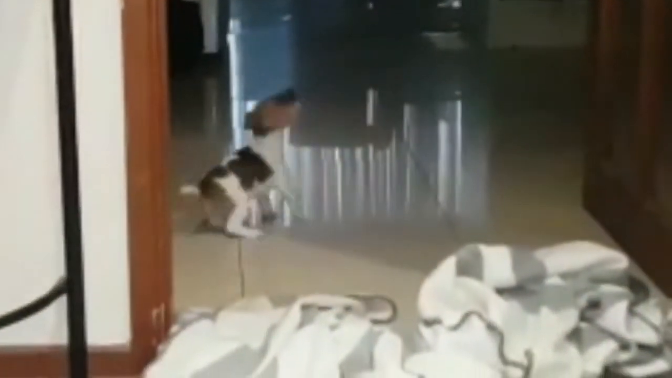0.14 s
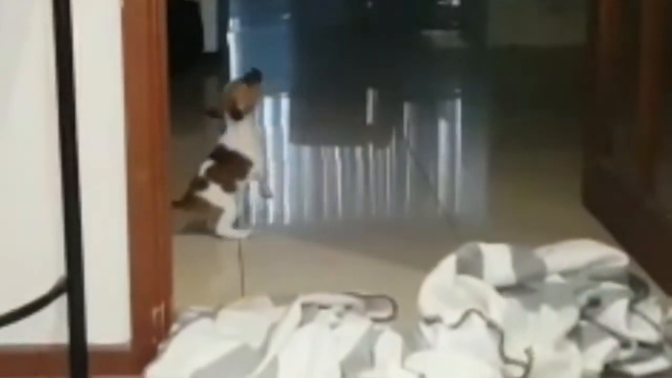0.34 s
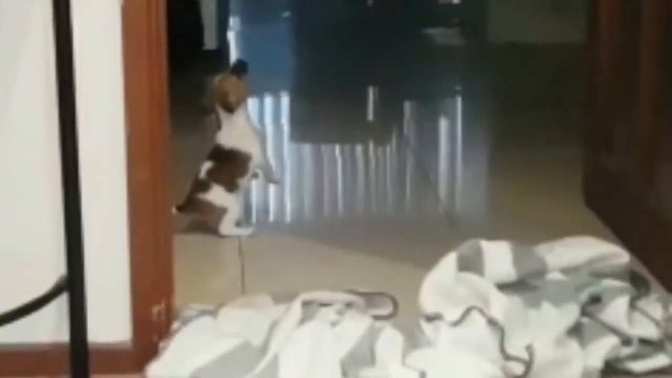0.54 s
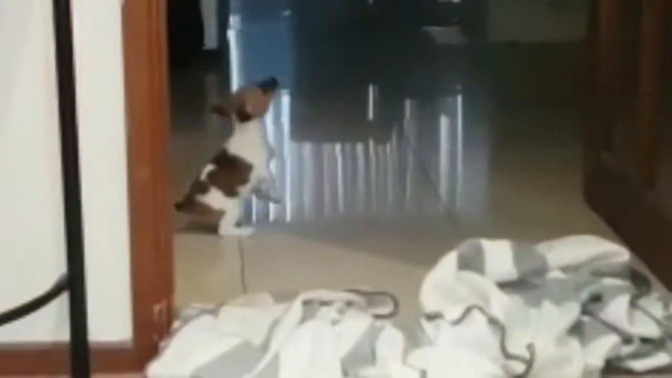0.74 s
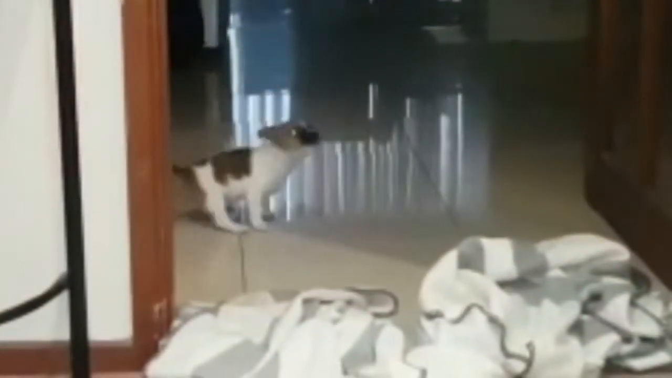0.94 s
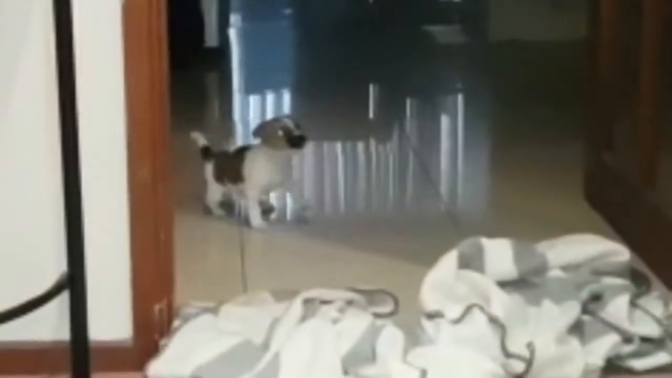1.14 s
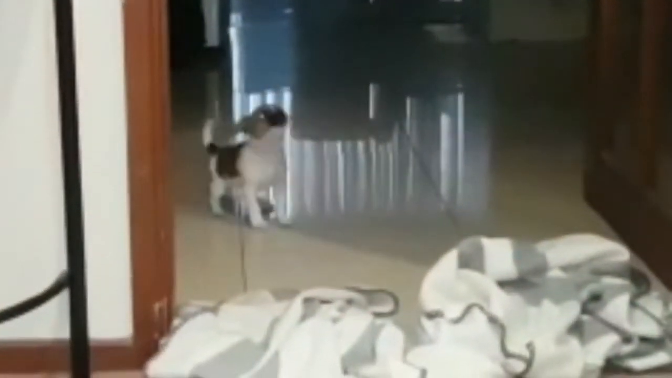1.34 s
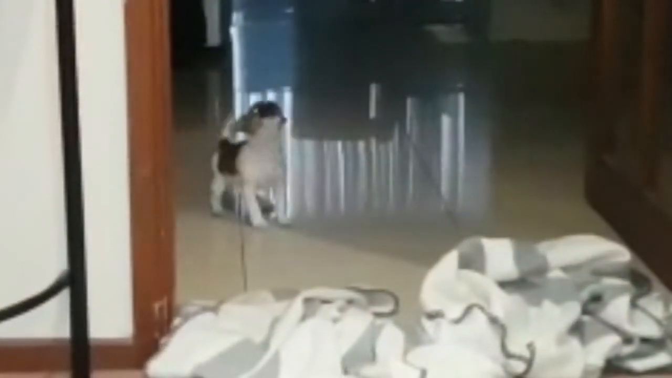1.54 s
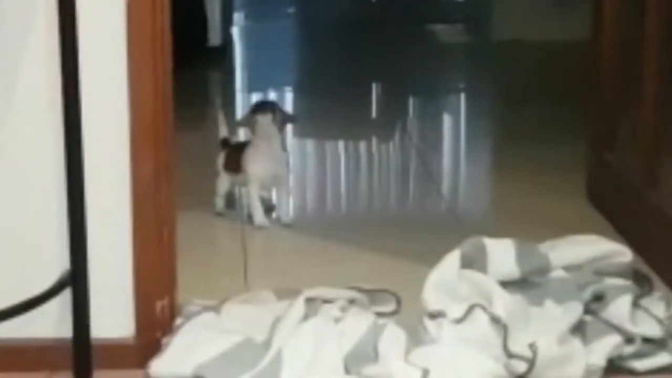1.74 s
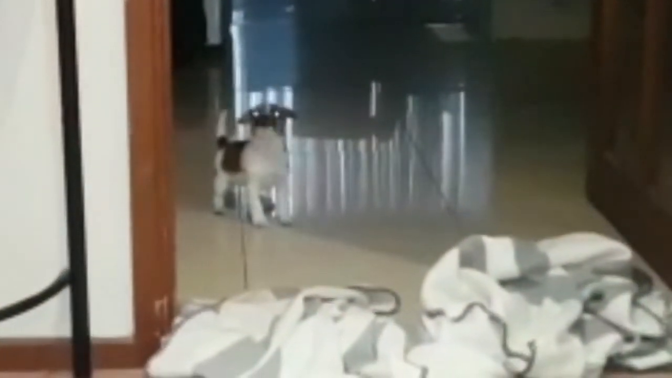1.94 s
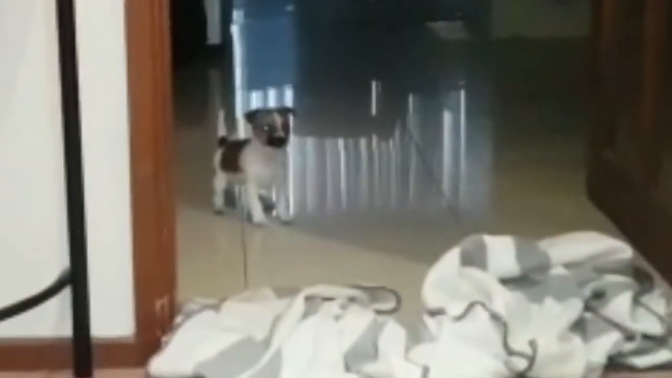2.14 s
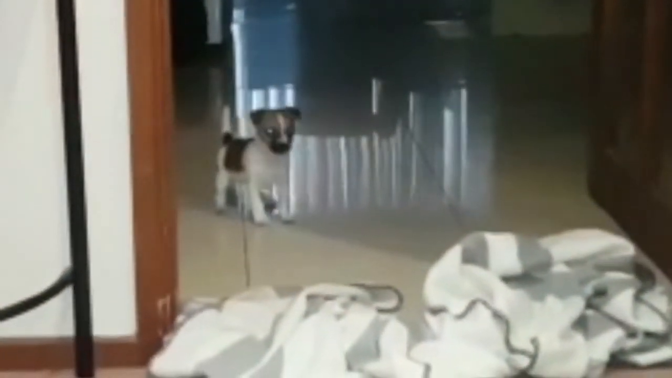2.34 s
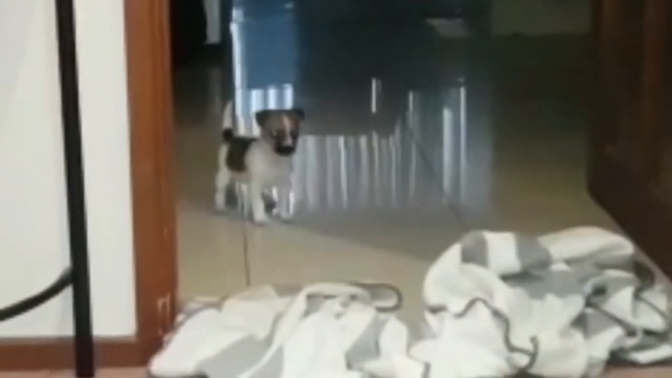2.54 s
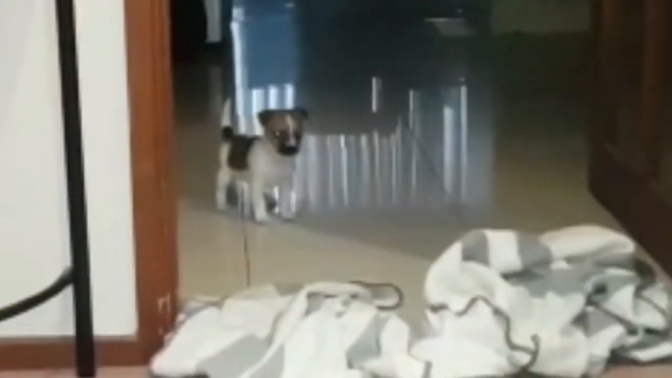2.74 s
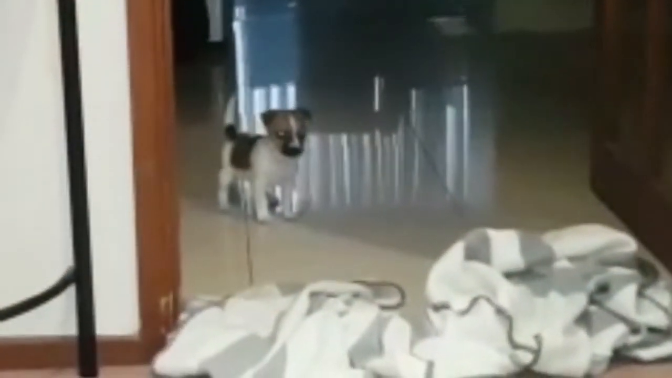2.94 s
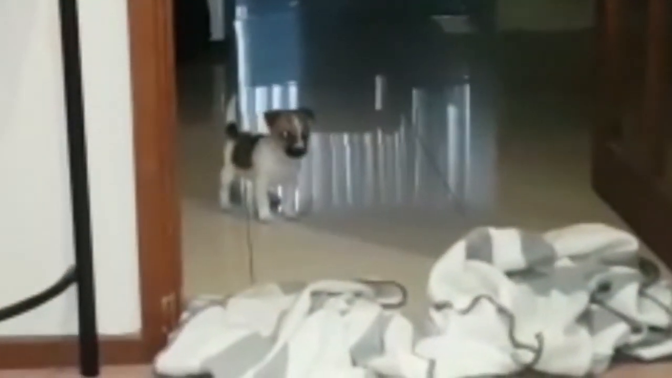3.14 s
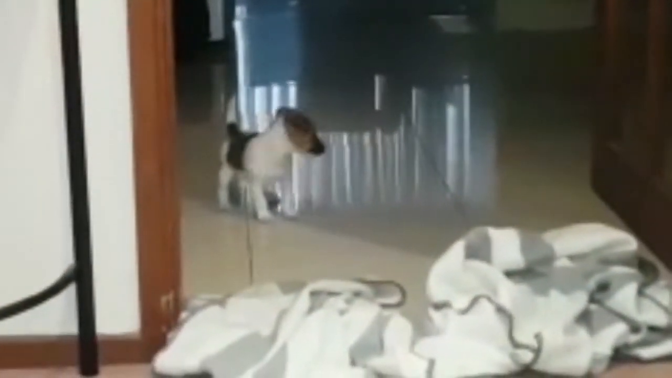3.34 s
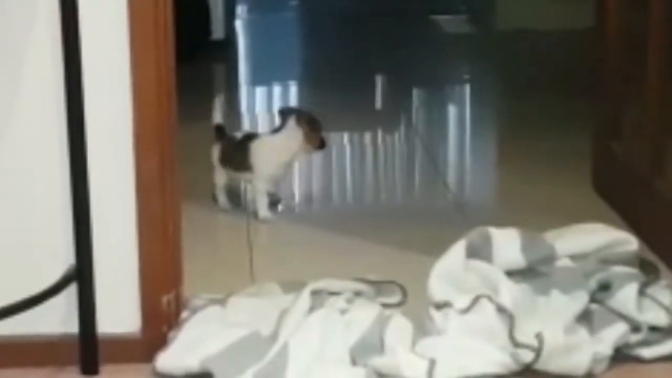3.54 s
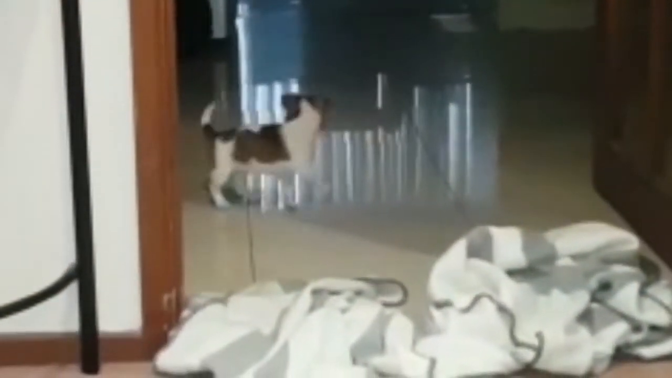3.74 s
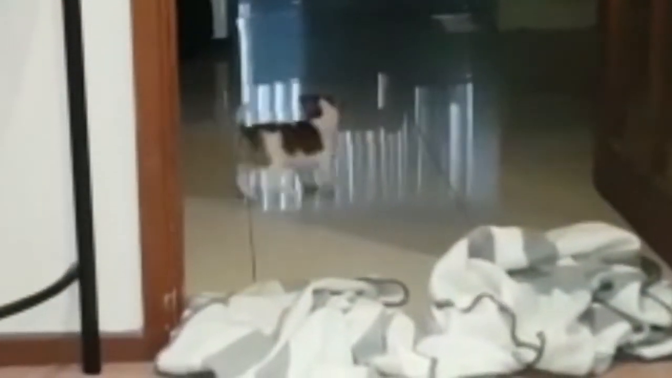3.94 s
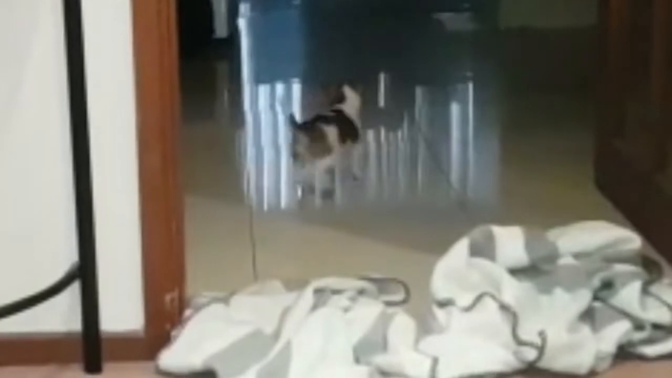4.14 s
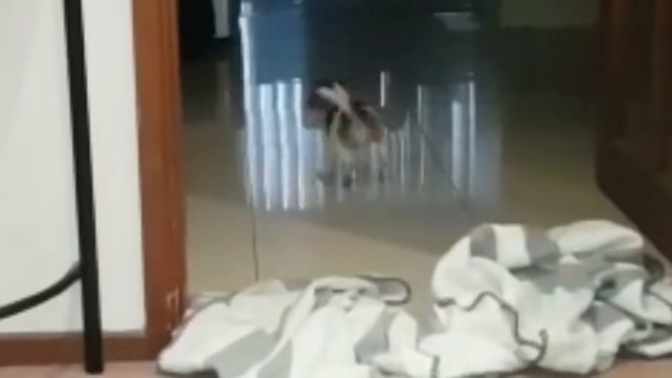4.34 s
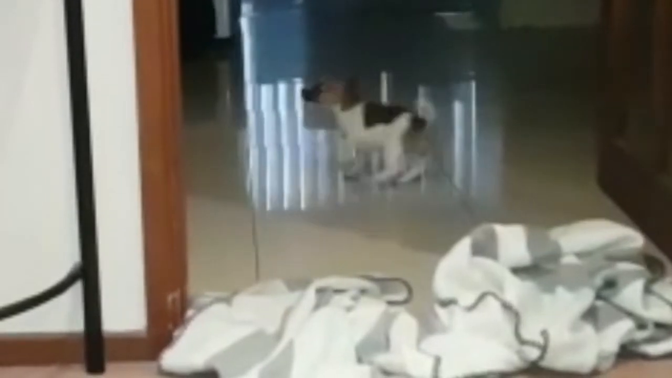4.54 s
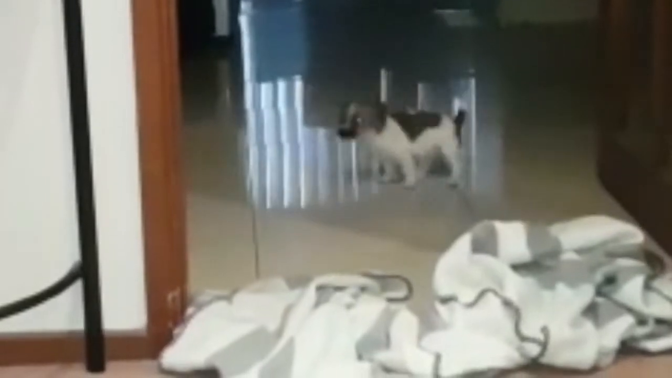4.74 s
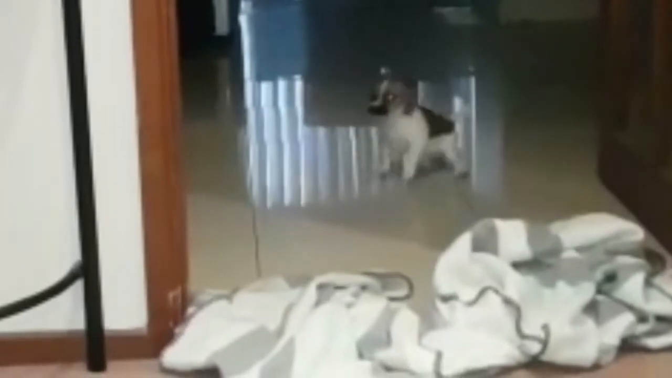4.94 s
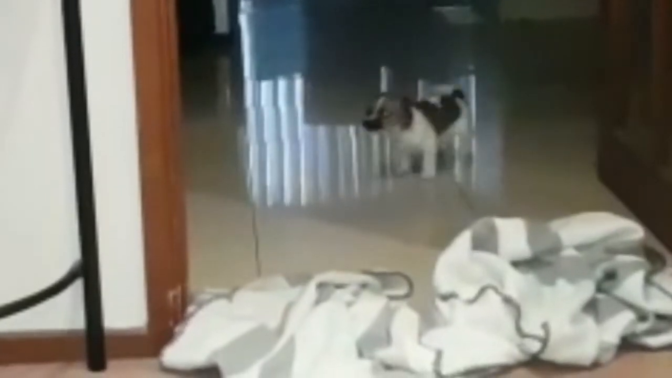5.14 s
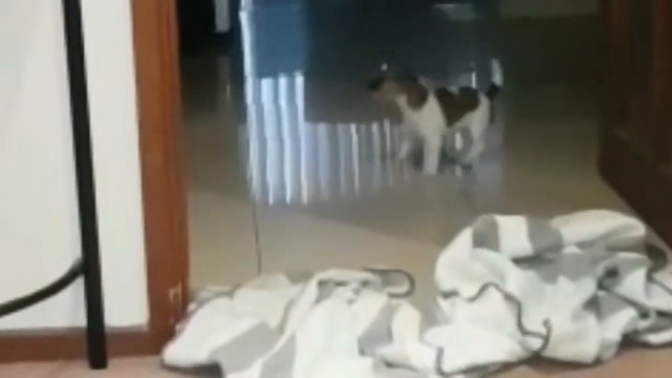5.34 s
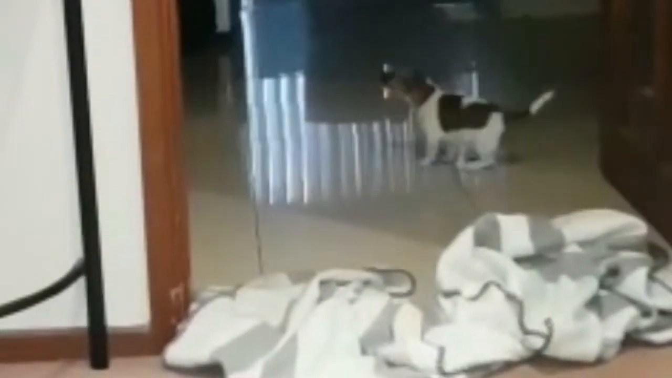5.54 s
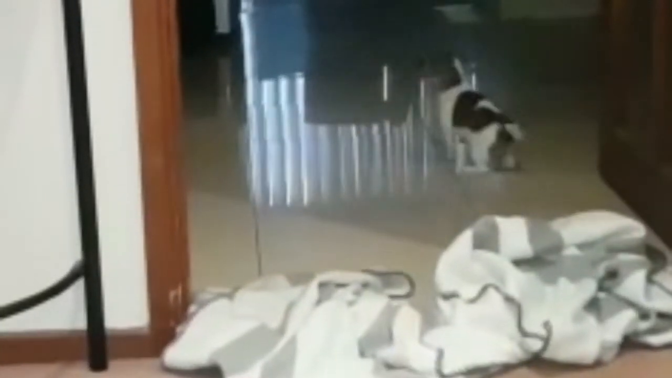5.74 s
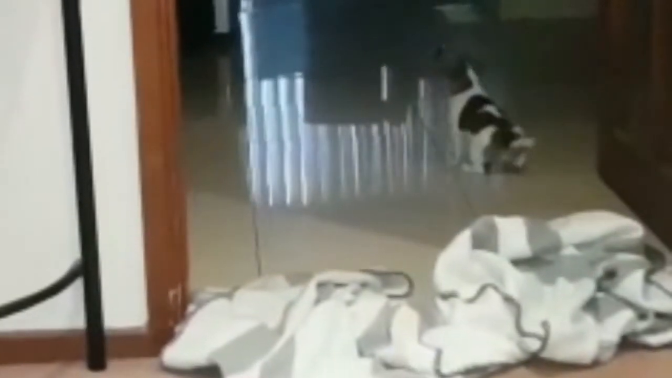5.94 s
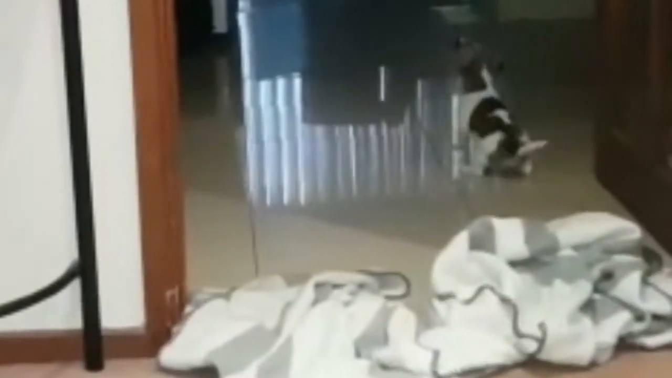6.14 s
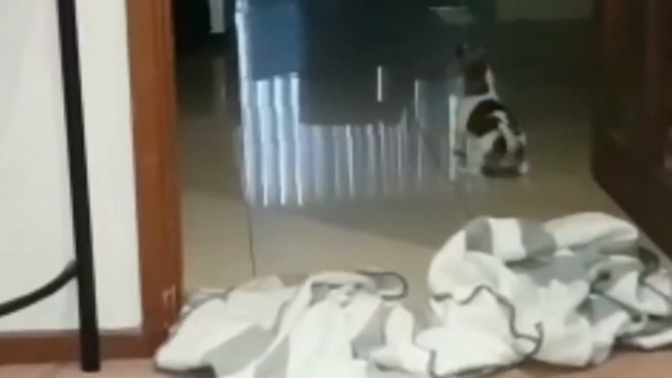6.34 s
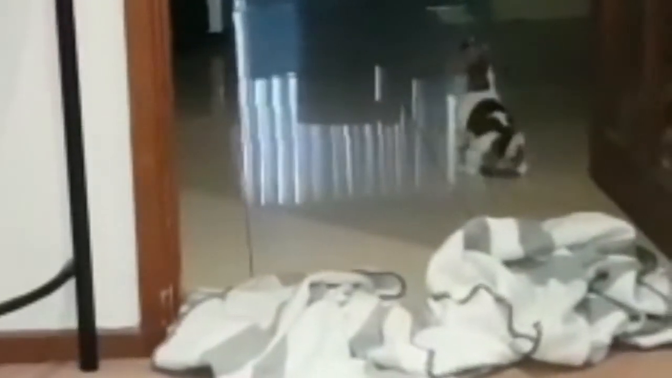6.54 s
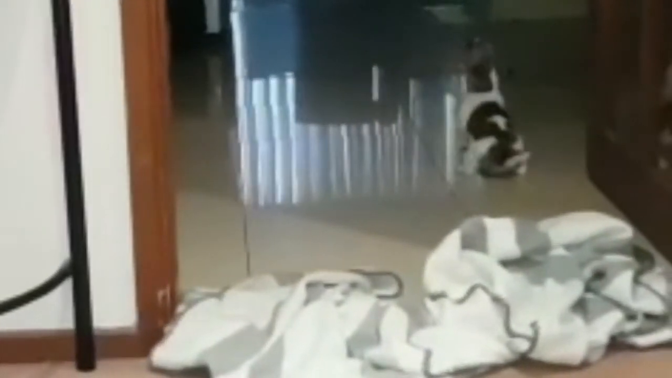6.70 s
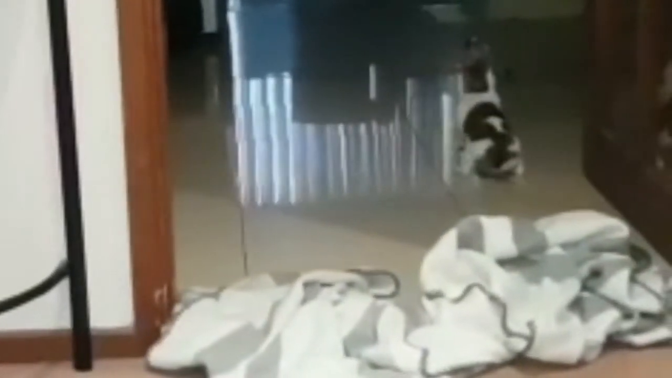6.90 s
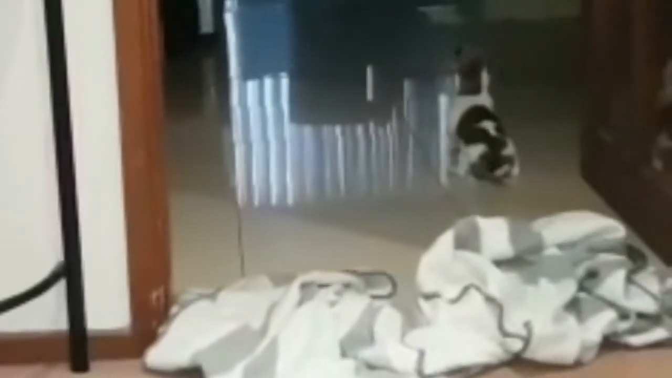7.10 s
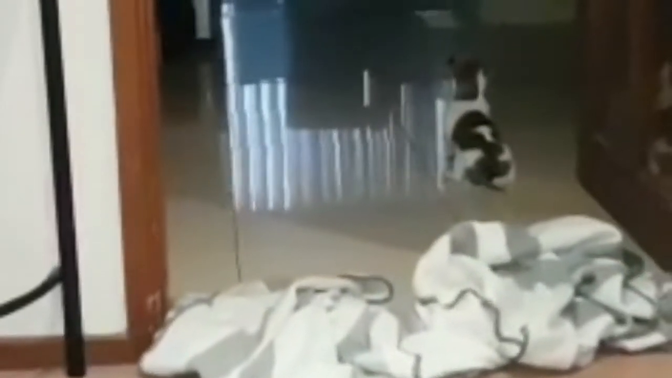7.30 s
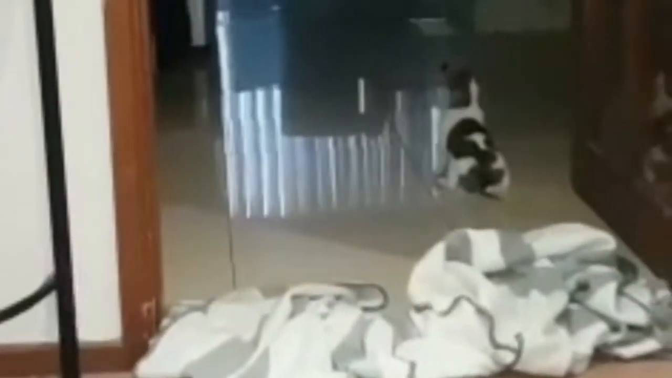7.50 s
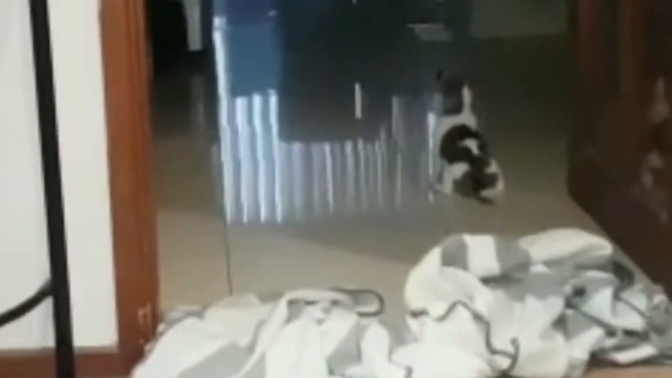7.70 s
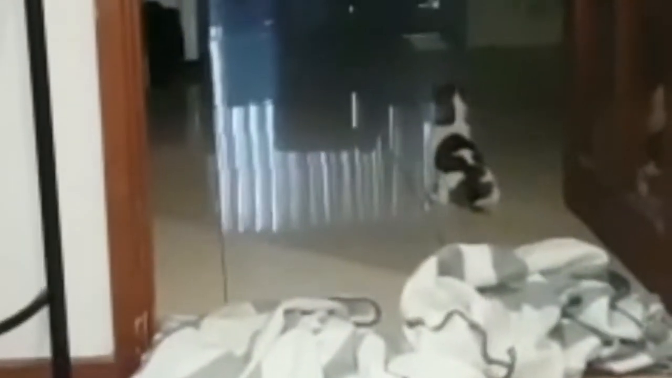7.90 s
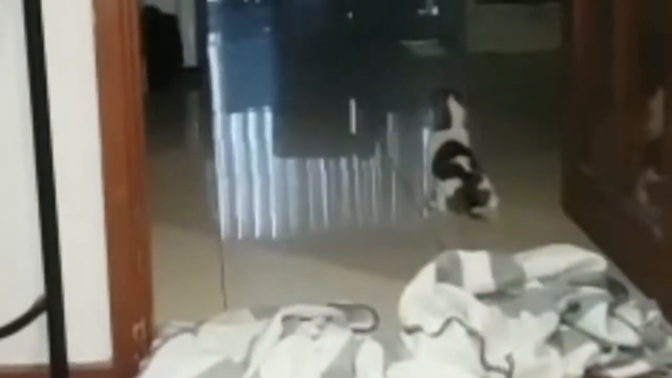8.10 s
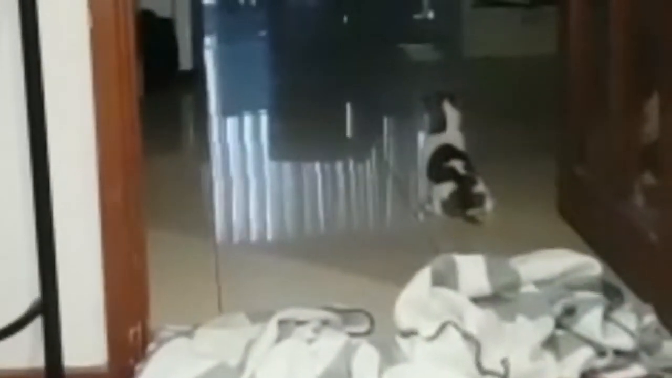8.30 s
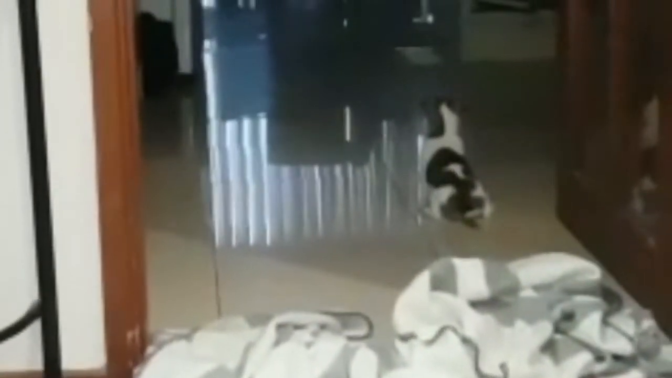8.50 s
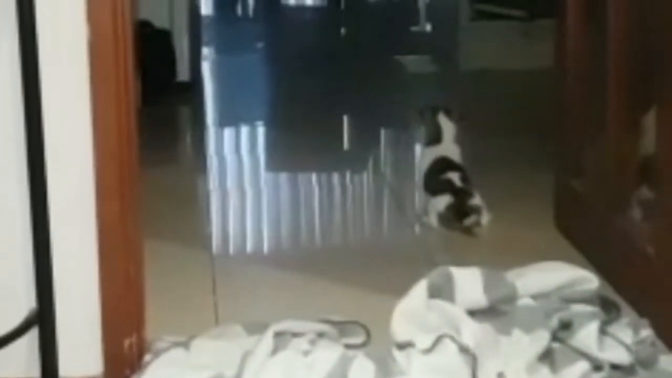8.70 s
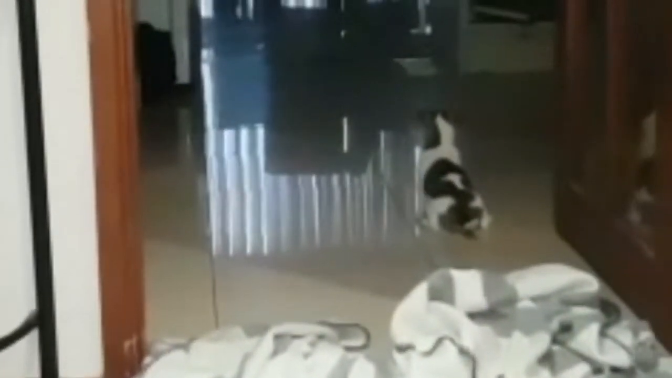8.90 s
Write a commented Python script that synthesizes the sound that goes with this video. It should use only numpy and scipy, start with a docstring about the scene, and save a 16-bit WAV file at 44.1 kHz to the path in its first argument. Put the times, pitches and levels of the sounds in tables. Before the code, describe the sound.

Over quiet room noise and a low hum, a young puppy cries in a high, wavering voice. Loud drawn-out whines come first, then a pause, then quick thin whimpers that arch and drop in pitch. Two stronger wails break into a rasp before the whimpering softens and thins out. Paws land softly and claws tick a couple of times on the tiles, and the room adds a short echo.

```python
"""A small puppy whimpers in a tiled, echoing room: its tight vocal folds sing high, arching cries, three of
which break into a rasp as the vibration turns chaotic. Air squeezed through its nose sounds a thin whistle
ahead of the softer cries and hisses in quick sniffs. Paws thud and claws tick on the floor, among soft high
rustles, even room noise and a low hum. The loudest cries overload the microphone."""
import sys
import numpy as np
from scipy import signal
from scipy.fft import rfft, irfft, next_fast_len
from scipy.io import wavfile
from scipy.ndimage import map_coordinates

SR = 44100
rng = np.random.default_rng(int(sys.argv[2]) if len(sys.argv) > 2 else 0)


def persist_wave(psi):
    """Save psi, clipped to +-1, as 16-bit WAV."""
    counts = np.round(np.clip(psi, -1, 1) * 32767).astype(np.int16)
    wavfile.write(sys.argv[1], SR, np.atleast_2d(counts).T)


N = 395136

# Levels are relative within each table; noise spectra give level per unit bandwidth.
AIR_SPECTRUM = [(20, -24), (45, -10), (100, -7), (135, -15), (165, -14), (210, -24), (400, -32), (700, -39),
                (1200, -44), (2000, -43), (4500, -46), (8500, -47), (12500, -45), (15500, -46)]  # room noise: f/Hz, level/dB
AIR_COHERENCE = [(60, 1), (180, 0.82), (550, 0.56), (1650, 0.6), (4970, -0.28), (15000, 0.28)]  # its likeness at left and right: f/Hz, correlation
HUM_PARTIALS = [(49, -63), (73, -56.5), (99, -55), (168, -61.5), (236, -67.5)]  # lines of the hum: f/Hz, level/dB
RUSTLE_SWELLS = [(-.1, 0.222, -45.5), (1.983, 2.462, -56.5), (4.322, 4.601, -56), (4.61, 4.793, -48)]  # soft high rustles: start/s, end/s, level/dB
RUSTLE_SPECTRUM = [(3000, -10), (6500, -12.5), (8200, -1), (9300, -3), (11500, -1), (13000, -3.5),
                   (15000, -22.5)]  # their colour: f/Hz, level/dB
PAW_IMPACTS = [(.005, -41, 229), (0.716, -39.5, 231), (.962, -46, 332), (6.263, -35.5, 222)]  # paws landing: t/s, level/dB, resonance/Hz
# four open-mouthed wails, each a contour of rows: t/s, f/Hz, fundamental/dB, octave/dB, nasal ring/dB
WAIL_CONTOURS = [
    [(0.01, 1296, -31, -33.5, -62), (0.036, 1253, -36, -41, -63), (0.15, 1284, -18.5, -43, -42.5),
     (0.2, 1471, -9.5, -41, -33), (0.256, 1298, -11.5, -38.5, -43), (0.306, 1298, -6.5, -21.5, -44.5),
     (0.424, 1219, -17, -24, -48.5), (0.562, 1124, -19, -18, -47), (0.67, 1087, -28, -35.5, -57.5)],
    [(1.14, 1035, -32, -39, -42.5), (1.198, 1126, -17.5, -29.5, -40), (1.232, 1225, -23.5, -33.5, -42),
     (1.294, 1231, -13, -18, -38), (1.352, 1189, -15.5, -15.5, -36.5), (1.466, 1113, -5, -17.5, -41),
     (1.484, 1110, -13, -15.5, -44), (1.588, 1048, -16, -33, -40.5), (1.67, 1008, -32.5, -50, -51)],
    [(5.86, 1227, -35, -39, -44), (5.902, 1325, -11.5, -42, -42), (5.928, 1286, -17.5, -30, -41),
     (5.982, 1298, -12.5, -25.5, -46.5), (6.01, 1330, -11, -21.5, -40.5), (6.094, 1234, -15, -19.5, -40),
     (6.132, 1288, -13, -22.5, -42), (6.184, 1181, -15.5, -19, -40.5), (6.22, 1158, -20.5, -28.5, -49)],
    [(6.56, 1138, -20, -43, -43), (6.588, 1327, -29.5, -41, -38), (6.604, 1298, -12.5, -38.5, -46.5),
     (6.622, 1290, -16.5, -37.5, -41), (6.728, 1258, -16.5, -45, -43), (6.768, 1222, -19, -31, -45.5),
     (6.848, 1166, -21, -24.5, -42), (6.89, 1110, -18.5, -26.5, -47), (6.97, 1094, -28, -32, -52.5)],
]
MUZZLE_RESPONSE = [(2900, -9), (3450, -14.5), (3900, -2.5), (4500, -1), (5200, -1), (5900, -7), (7000, -27),
                   (8500, -12.5), (9700, -22), (11200, -19), (13000, -25.5)]  # filter on the upper harmonics: f/Hz, gain/dB
THROAT_SPECTRUM = [(400, -43), (600, -25), (710, -11.5), (800, -14), (900, -10), (1400, 0), (1750, -9.5),
                   (2100, -11), (2500, -8.5), (2750, -26.5), (3400, -44.5), (5200, -35.5), (7000, -53.5),
                   (10300, -43), (12500, -77)]  # colour of rasp and breath: f/Hz, level/dB
NOSE_SPECTRUM = [(1500, -27), (2700, -14), (3400, -19), (4500, 5), (5100, -3), (5900, -19.5), (8500, -5),
                 (11500, -10.5), (15000, -26.5)]  # air hissing through the nose: f/Hz, level/dB
VOICE_BREAKS = [(0.189, 0.205, 0.04), (5.935, 6.039, 0.7), (6.037, 6.151, 0.64), (6.589, 6.682, 0.26)]  # chaotic spells of the folds: start/s, end/s, roughness (0-1)
# short arches of pitch: start/s, rise/s, fall/s, linger/s, top f/Hz, low f/Hz, level/dB,
# mouth opening/dB, nasal ring/dB, leading whistle/dB
WHIMPER_ARCHES = [(0.802, 0.06, 0.06, 0, 1054, 979, -25, 2.5, -40, -87),
                  (1.034, 0.045, 0.057, 0.02, 1090, 1006, -28, 0, -47, -71),
                  (1.912, 0.09, 0.16, 0.018, 1140, 1099, -26.5, -1.5, -49, -84),
                  (3.38, 0.15, 0.085, 0.018, 1743, 1715, -31, -2, -42, -54.5),
                  (3.808, 0.045, 0.18, 0.012, 1559, 1352, -25, -3, -44, -55.5),
                  (4.2, 0.02, 0.19, 0, 1610, 1249, -23.5, -6, -48, -58),
                  (4.577, 0.015, 0.02, 0.016, 1849, 1756, -30.5, -2, -44.5, -61),
                  (4.6, 0.0037, 0.19, 0.0069, 1624, 1188, -23, -4, -42, -52),
                  (4.943, 0.022, 0.18, 0.021, 1641, 1141, -22.5, -2, -36.5, -53.5),
                  (5.293, 0.065, 0.11, 0.095, 1498, 1103, -22.5, 0.5, -41, -55),
                  (5.68, 0.045, 0.095, 0.045, 1547, 1197, -25.5, 1, -44.5, -62),
                  (6.373, 0.075, 0.06, 0.084, 1148, 1099, -21, -2.5, -36.5, -57.5),
                  (7.169, 0.065, 0.16, 0.1, 1170, 1056, -24.5, -2, -45, -64),
                  (7.758, 0.06, 0.13, 0, 1148, 995, -30, -7, -59, -57),
                  (8.793, 0.07, 0.06, 0.13, 1607, 1468, -24, -14, -41, -57)]
# a nearly shut mouth lets the octave out only at low pitch: f/Hz, octave minus fundamental/dB
SHUT_MOUTH_OCTAVE = [(980, -12.5), (1130, -20), (1350, -28.5), (1600, -32.5)]
SNIFF_SWELLS = [(3.66, 3.77, -55), (3.99, 4.13, -58)]  # quick sniffs between cries: start/s, end/s, level/dB
SNIFF_SPECTRUM = [(1300, -6), (2600, 3), (3800, -19), (8000, -30.5)]  # their colour: f/Hz, level/dB
CLAW_IMPACTS = [(5.561, -32.5), (7.08, -38.5)]  # claws on the tiles: t/s, level/dB
CLAW_SPECTRUM = [(600, -12.5), (2000, 6), (6000, -9), (15000, -11)]  # their colour: f/Hz, level/dB
PUFF_TONES = [(7.998, 0.085, 8750, -53), (7.997, 0.13, 2770, -61.5)]  # whistles of one voiceless puff: t/s, length/s, f/Hz, level/dB
REVERBERATION_TIME = [(200, 0.72), (1150, 0.42), (2500, 0.5), (5000, 0.45), (12000, 0.083)]  # decay of the room's tail: f/Hz, T60/s
DIRECT_BALANCE = [(500, -3), (1100, 0.5), (2300, -9), (4500, -8.5), (8000, 2.5)]  # the puppy's direct sound: f/Hz, left minus right/dB


def amp(db):
    """Amplitude ratio of a level in decibels."""
    return 10 ** (np.asarray(db) / 20)


def unit(x):
    """Normalisation to rms 1."""
    return x / np.sqrt(np.mean(x ** 2) + 1e-20)


def along(points, hz):
    """Interpolation of (f/Hz, value) points on a logarithmic frequency axis."""
    f, v = np.transpose(points)
    return np.interp(np.log(hz + 1), np.log(f + 1), v)


def wobble(rate, size):
    """Random modulation: a smooth curve through `rate` knots a second."""
    knots = rng.standard_normal(int(size * rate / SR) + 4)
    return map_coordinates(knots, [np.arange(size) * rate / SR])


def filtered(x, response):
    """Linear filtering: the spectrum of x times a frequency response."""
    m = next_fast_len(x.shape[-1] + 8192)
    return irfft(rfft(x, m) * response(np.fft.rfftfreq(m, 1 / SR)), m)[..., :x.shape[-1]]


def gate(t, start, end, edge):
    """Raised-cosine window, its edges centred on start and end."""
    return np.sin(np.pi / 2 * np.clip(np.minimum(t - start, end - t) / edge + .5, 0, 1)) ** 2


def add(track, start, sound):
    """Superposition of a sound on the track, from start in seconds."""
    part = track[max(0, round(start * SR)):][:len(sound)]
    part += sound[:len(part)]


def hiss(spectrum, size):
    """Spectral shaping of white noise, at rms 1."""
    return unit(filtered(rng.standard_normal(size), lambda hz: amp(along(spectrum, hz))))


def room_noise(level_db=-43.5):
    """Partial coherence: the balance of mid and side noise sets how alike left and right are."""
    def response(hz):
        angle = np.arccos(np.clip(along(AIR_COHERENCE, hz), -1, 1)) / 2
        return amp(along(AIR_SPECTRUM, hz)) * [np.cos(angle), np.sin(angle)]
    mid, side = filtered(rng.standard_normal((2, N)), response)
    return amp(level_db) * unit(np.array([mid + side, mid - side]))


def hum(drift_db=2, wander_rad=0.33):
    """Random amplitude and phase modulation leave the low partials slightly unsteady."""
    t = np.arange(N) / SR
    return np.sqrt(2) * sum(
        amp(db + drift_db * wobble(16, N)) * np.sin(2 * np.pi * hz * t + wander_rad * wobble(36, N))
        for hz, db in HUM_PARTIALS)


def noise_swells(swells, spectrum, edge):
    """Amplitude modulation of coloured noise gives a soft rustle or a sniff."""
    t = np.arange(N) / SR
    envelope = sum(amp(db) * gate(t, start, end, edge) for start, end, db in swells)
    return envelope * amp(1.3 * wobble(16, N)) * hiss(spectrum, N)


def paws(t60=0.23, attack_s=0.0072, half_width_hz=30, slap_hz=850):
    """Damped resonance: a soft pad lands with a dull slap and one low, decaying mode."""
    track, t = np.zeros(N), np.arange(SR // 3) / SR
    for start, db, body_hz in PAW_IMPACTS:
        body = lambda hz: 1 / (1 + ((hz - body_hz) / half_width_hz) ** 2)
        slap = lambda hz: 0.5 * (hz > body_hz) / (1 + (hz / slap_hz) ** 2) ** 2
        thud = unit(filtered(rng.standard_normal(len(t)), lambda hz: body(hz) + slap(hz)))
        add(track, start, amp(db + 7 - 60 * t / t60) * (1 - np.exp(-t / attack_s)) * thud)
    return track


def cry(contour, jitter=.006, squeak_jitter=.011, flutter=.042, tremor_db=1.64,
        voice_db=-1.5, octave_db=-2, ring_db=-4, rasp_db=-2, breath_db=-34.5,
        nose_db=-15, nose_hz=5100, focus_db=5.5, whistle_hz=8800, whistle_db=-11):
    """Source and filter: tight vocal folds sing a nearly pure tone, coloured by mouth and nose."""
    times, *columns = np.transpose(contour)
    t = np.arange(times[0] - .01, times[-1] + .02, 1 / SR)
    n = len(t)
    pitch, base, octave, ring = (np.interp(t, times, column) for column in columns)
    # where the folds break up, pitch and strength turn chaotic
    rough = np.clip(sum(depth * gate(t, start, end, .018) for start, end, depth in VOICE_BREAKS), 0, 1)
    # a closed mouth hides the octave; such thin squeaks are less steady than open cries
    closed = np.clip((base - octave) / 30, 0, 1)
    pitch *= (1 + jitter * wobble(60, n) + squeak_jitter * closed * wobble(260, n)
              + flutter * np.sqrt(rough) * wobble(300, n))
    phase = 2 * np.pi * np.cumsum(pitch) / SR
    tone = amp(base + voice_db) * np.sin(phase) + amp(octave + octave_db) * np.sin(2 * phase)
    # upper harmonics fray; with the mouth closed, those near the nasal resonance get out best
    for k in range(3, 12):
        fray = (.15 + .6 * closed + 1.5 * rough) * wobble(200, n)
        muffled_db = focus_db * closed * (1 - np.exp(-((k * pitch - nose_hz) / 1000) ** 2))
        harmonic_db = ring + ring_db + along(MUZZLE_RESPONSE, k * pitch) - muffled_db
        tone += amp(harmonic_db + 5.9 * wobble(25, n)) * np.sin(k * phase + fray)
    tone *= np.sqrt(2) * amp(tremor_db * wobble(50, n))
    tone *= 1 + 0.58 * np.sqrt(rough) * np.tanh(wobble(250, n))
    # the folds chop a whistle in the nose into sidebands above it
    carrier = np.sin(2 * np.pi * np.cumsum(whistle_hz * (1 + .025 * wobble(35, n))) / SR)
    chopped = carrier * (1.2 * np.sin(2 * phase) + np.sin(3 * phase))
    sidebands = amp(whistle_db + 2 * wobble(14, n)) * filtered(chopped, lambda hz: hz > whistle_hz)
    nasal = closed ** 2 * amp(ring) * (sidebands + amp(nose_db) * hiss(NOSE_SPECTRUM, n))
    throat = amp(base) * (rough * amp(rasp_db) * rasp(n) + amp(breath_db) * hiss(THROAT_SPECTRUM, n))
    sound = (1 - .5 * rough) * tone + throat + nasal
    return t[0], sound * gate(t, times[0] + .004, times[-1], edge=.02)


def wails():
    """Sustained phonation: four long cries, whose octave radiates as the mouth opens."""
    track = np.zeros(N)
    for contour in WAIL_CONTOURS:
        add(track, *cry(contour))
    return track


def rasp(size, rate_hz=179, scatter=0.027, air=0.58, ring_t60=0.026):
    """Impulse excitation: breaking folds flap slowly and unevenly, and each flap rings in the throat."""
    cycles = np.cumsum(rate_hz * (1 + scatter * wobble(150, size))) / SR
    flaps = np.diff(np.floor(cycles), prepend=0) * amp(2.5 * wobble(200, size))
    t = np.arange(SR // 30) / SR
    flap_response = rng.standard_normal(len(t)) * amp(-60 * t / ring_t60)
    ringing = signal.fftconvolve(flaps, flap_response)[:size]
    puffs = unit(ringing) + air * rng.standard_normal(size)
    return unit(filtered(puffs, lambda hz: amp(along(THROAT_SPECTRUM, hz))))


def nose_whistle(length, hz, rise=0.055, waver=0.022):
    """Flow-excited tone: air squeezed through the nose whistles, sliding up into its pitch."""
    t = np.arange(int((length + 0.026) * SR)) / SR
    pitch = hz * (1 - rise * np.exp(-t / 0.045) + waver * wobble(140, len(t)))
    return np.sqrt(2) * np.sin(2 * np.pi * np.cumsum(pitch) / SR) * gate(t, 0.0086, length, edge=0.018)


def whimper_contour(start, rise, fall, linger, top_hz, low_hz, db, mouth_db, ring_db,
                    scoop_depth=0.115, scoop_s=0.051, recover_hz_per_s=300):
    """Frequency glide: the pitch scoops up, falls and lingers low while the voice swells and fades."""
    progress = np.linspace(0, 1, 60)
    t = progress * (rise + fall + linger)
    scoop = scoop_depth * (1 - np.exp(-(np.minimum(t - rise, 0) / scoop_s) ** 2))
    fallen = np.clip((t - rise) / fall, 0, 1) ** 1.45  # starts gently and steepens
    recovery = recover_hz_per_s * np.maximum(t - rise - fall, 0)
    pitch = top_hz * (1 - scoop) - (top_hz - low_hz) * fallen + recovery
    effort_db = np.interp(progress, [0, 0.54, 1], [-6.5, 0, -5])
    opening = progress - .5  # the mouth opens a little, letting out more octave and nasal ring
    base = db + effort_db
    octave = base + along(SHUT_MOUTH_OCTAVE, pitch) + mouth_db + 5 * opening
    ring = ring_db + effort_db + 3.5 * opening
    return np.transpose([start + t, pitch, base, octave, ring])


def whimpers(lead_s=0.038):
    """Nasal phonation: short cries with the mouth nearly shut, each led by a whistle of the nose."""
    track = np.zeros(N)
    for start, rise, fall, linger, top_hz, low_hz, db, mouth_db, ring_db, whistle_db in WHIMPER_ARCHES:
        contour = whimper_contour(start, rise, fall, linger, top_hz, low_hz, db, mouth_db, ring_db)
        add(track, *cry(contour, jitter=.0048, squeak_jitter=.012, flutter=.035, tremor_db=1.15,
                        voice_db=-2.1, ring_db=-5, rasp_db=-1, breath_db=-32.5,
                        nose_db=-14, nose_hz=4850, focus_db=13, whistle_db=-11.5))
        whistle_hz = 8733 + 1.6 * (top_hz - low_hz)  # higher before a deep fall
        add(track, start - lead_s, amp(whistle_db) * nose_whistle(length=0.085, hz=whistle_hz))
    return track


def claws(t60=0.013):
    """Hard impact: a claw on tile makes a bright tick that decays exponentially."""
    track, t = np.zeros(N), np.arange(SR // 3) / SR
    for start, db in CLAW_IMPACTS:
        add(track, start, amp(db - 60 * t / t60) * hiss(CLAW_SPECTRUM, len(t)))
    return track


def voiceless_puff():
    """Airflow without phonation: the nose whistles two tones at once."""
    track = np.zeros(N)
    for start, length, hz, db in PUFF_TONES:
        add(track, start, amp(db) * nose_whistle(length, hz))
    return track


def reverberation(x, tail_db=-7, early_db=-8, early_t60=0.13, width=0.91):
    """Reflection from hard floor and walls: an early burst and a tail that dies sooner in the treble."""
    hz, t, spectra = signal.stft(rng.standard_normal((2, SR)), SR, nperseg=256)
    decay = amp(-60 * t / along(REVERBERATION_TIME, hz)[:, None])
    tail = signal.istft(spectra * decay, SR, nperseg=256)[1][:, :SR]
    early = rng.standard_normal((2, SR)) * amp(-60 * np.arange(SR) / SR / early_t60)
    impulse_response = (amp(tail_db) * unit(tail) + amp(early_db) * unit(early)) / np.sqrt(SR)
    delayed = np.pad(x, (SR // 300, 0))
    mid, side = signal.fftconvolve(delayed[None], impulse_response, axes=1)[:, :N]
    return np.array([mid + width * side, mid - width * side])


def scene(lag_ms=0.037):
    """Direct and diffuse fields: the puppy reaches the two sides unequally, the room answers all round."""
    sound = wails() + whimpers() + voiceless_puff() + paws() + claws()
    sound += noise_swells(SNIFF_SWELLS, SNIFF_SPECTRUM, edge=0.059)
    sound += noise_swells(RUSTLE_SWELLS, RUSTLE_SPECTRUM, edge=0.15)
    sides = np.array([[.5], [-.5]])
    balance = lambda hz: amp(sides * along(DIRECT_BALANCE, hz))
    time_shift = lambda hz: np.exp(2j * np.pi * sides * hz * lag_ms / 1000)
    direct = filtered(sound, lambda hz: balance(hz) * time_shift(hz))
    return direct + reverberation(sound) + room_noise() + hum()


def record(dry, band_limit_hz=15750):
    """Overload: peaks clip just under full scale, and nothing above the band limit passes."""
    return filtered(np.clip(dry, -.98, .98), lambda hz: hz < band_limit_hz)


dry = scene()
out = record(dry)
persist_wave(out)
```